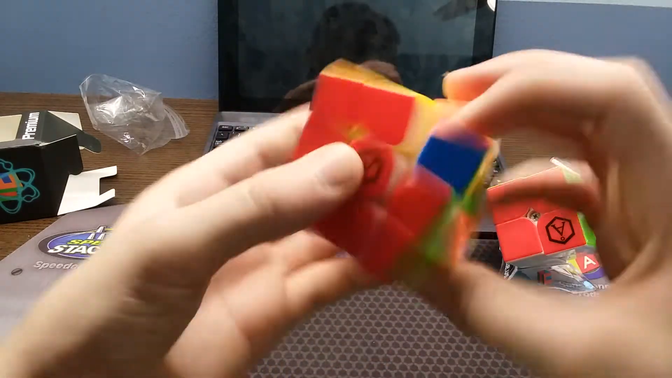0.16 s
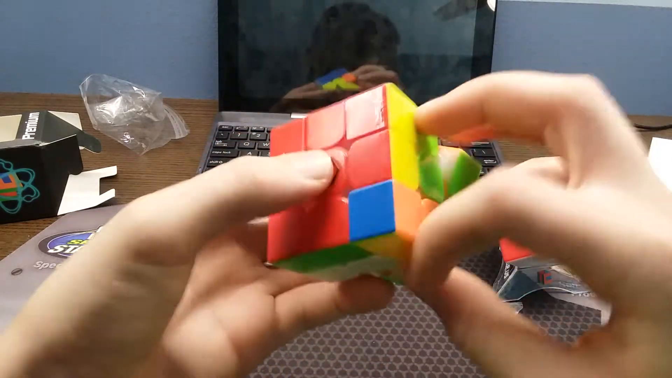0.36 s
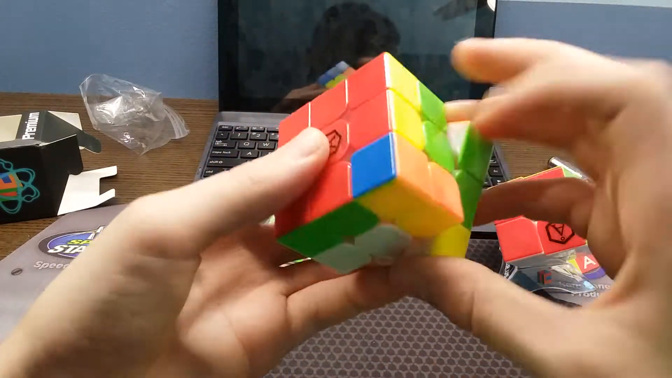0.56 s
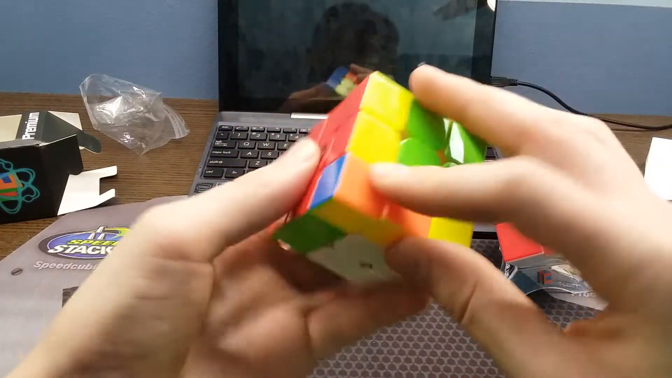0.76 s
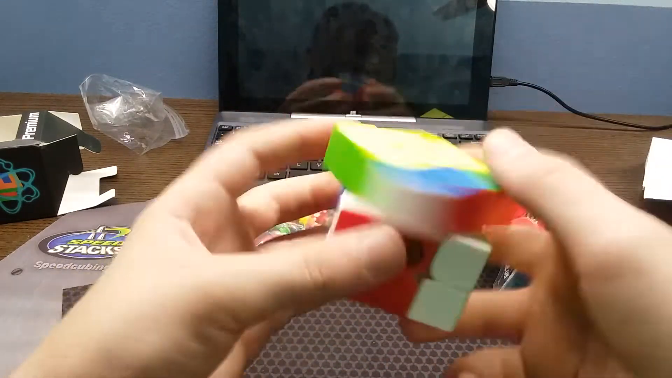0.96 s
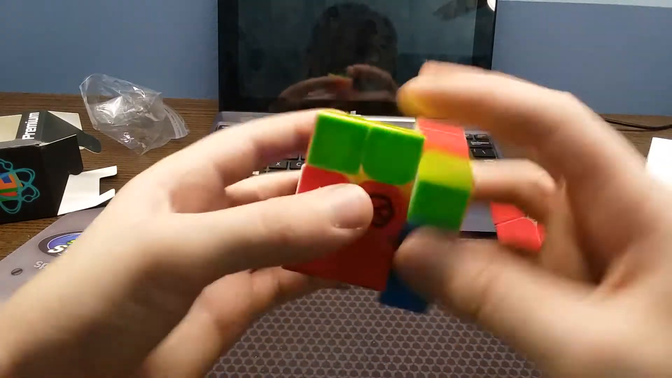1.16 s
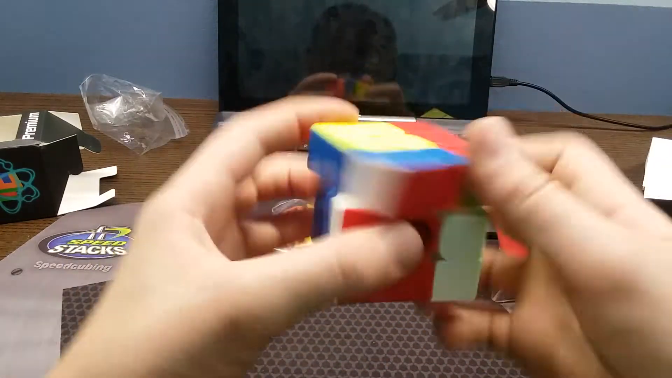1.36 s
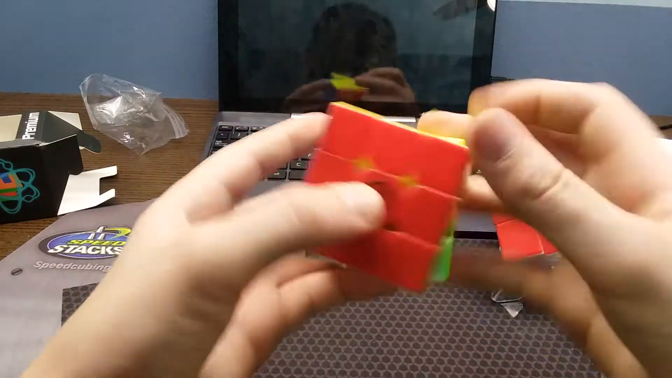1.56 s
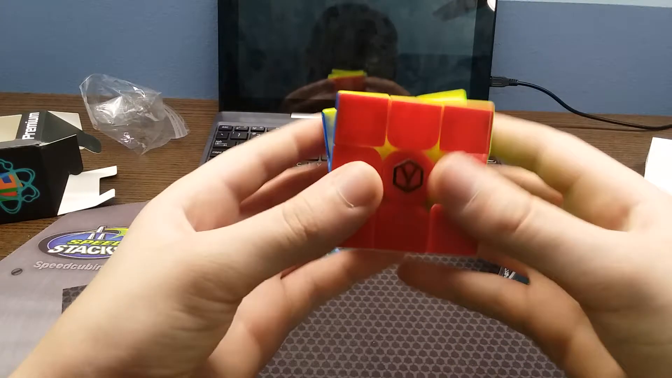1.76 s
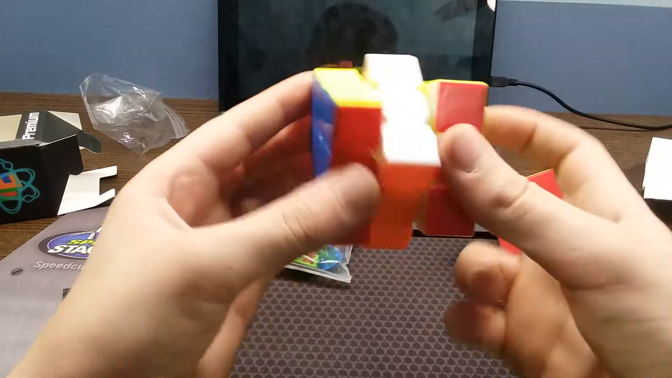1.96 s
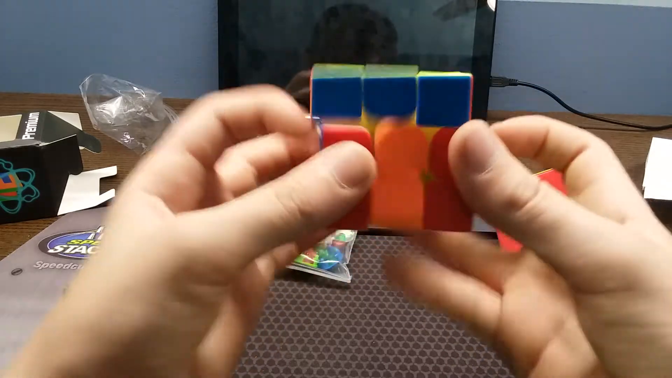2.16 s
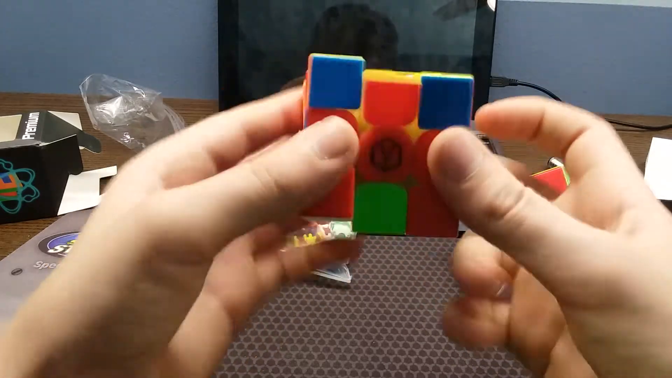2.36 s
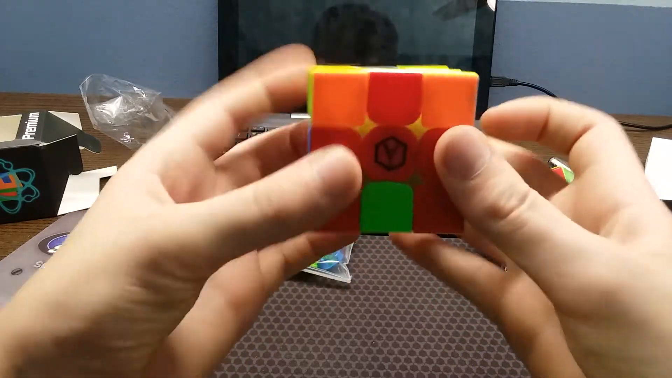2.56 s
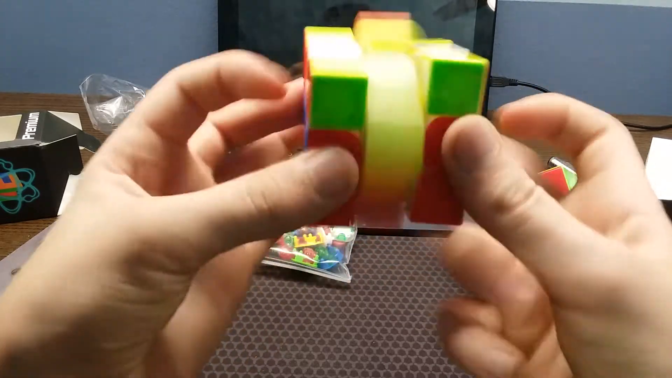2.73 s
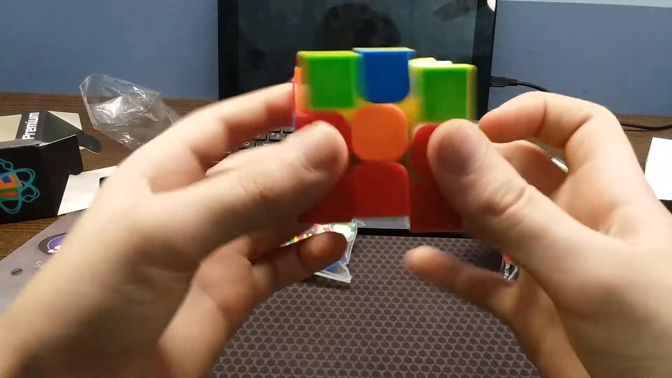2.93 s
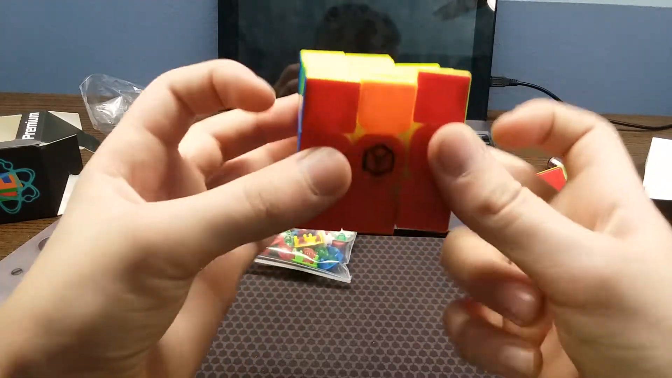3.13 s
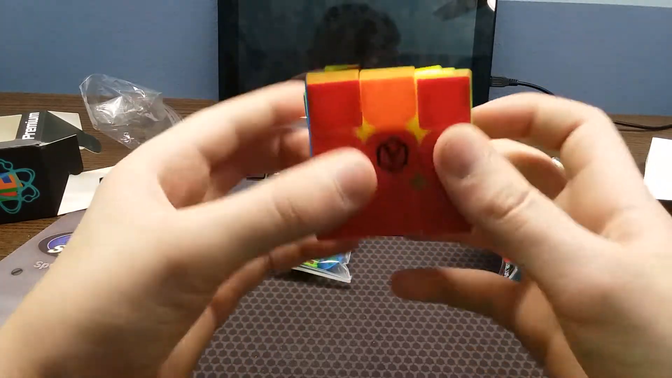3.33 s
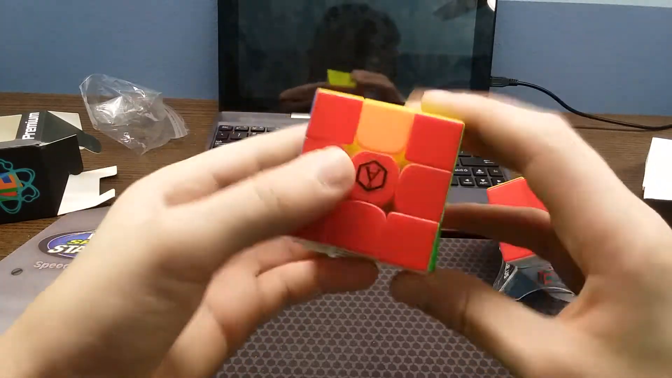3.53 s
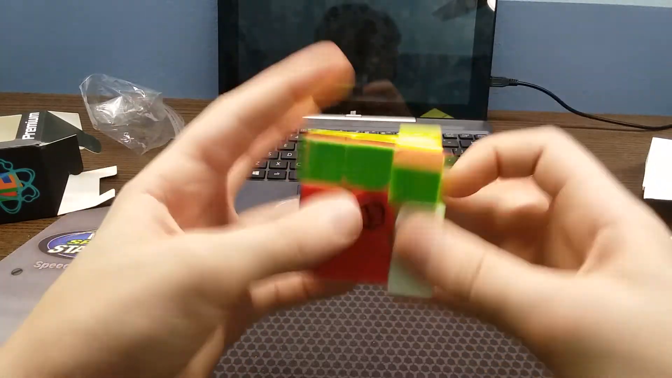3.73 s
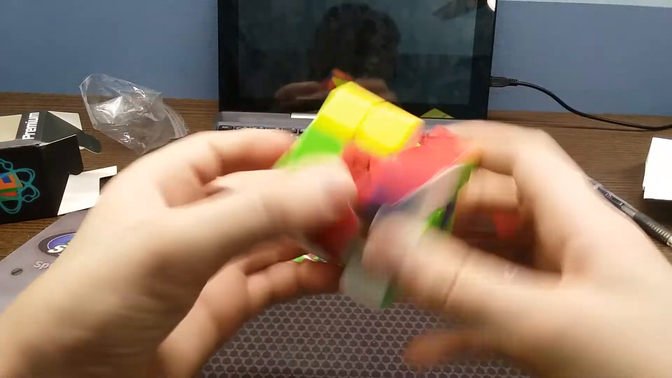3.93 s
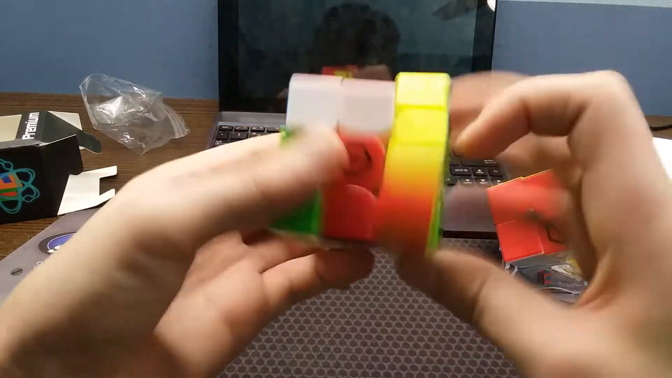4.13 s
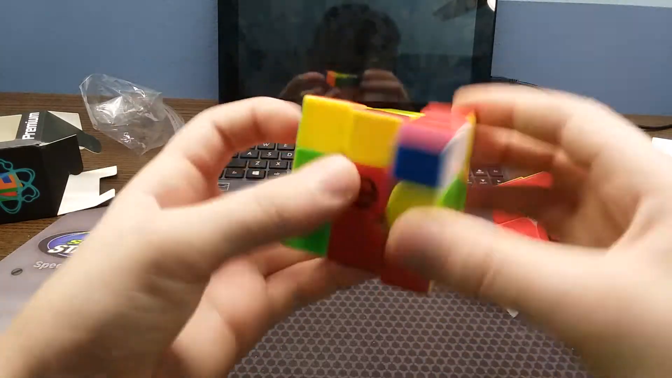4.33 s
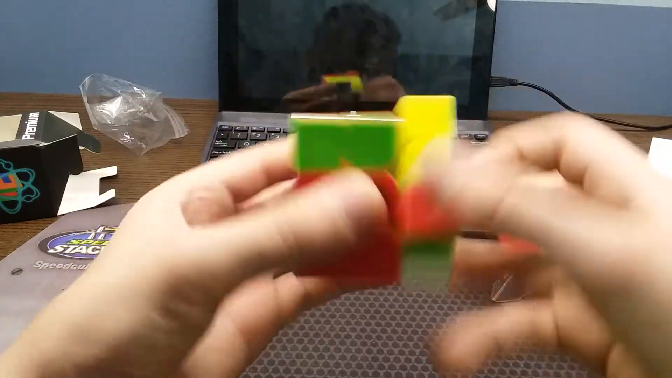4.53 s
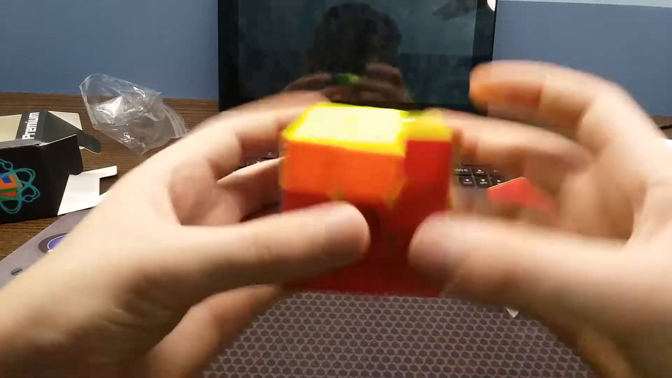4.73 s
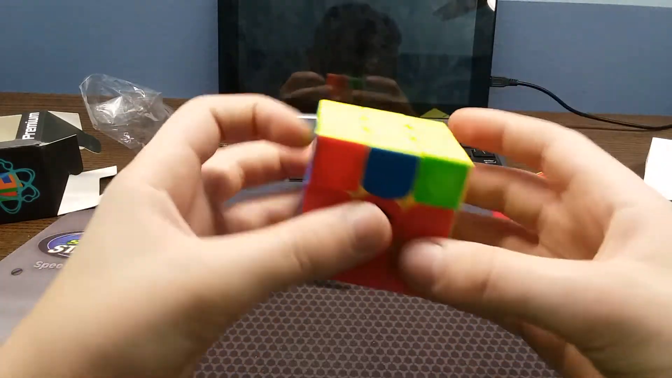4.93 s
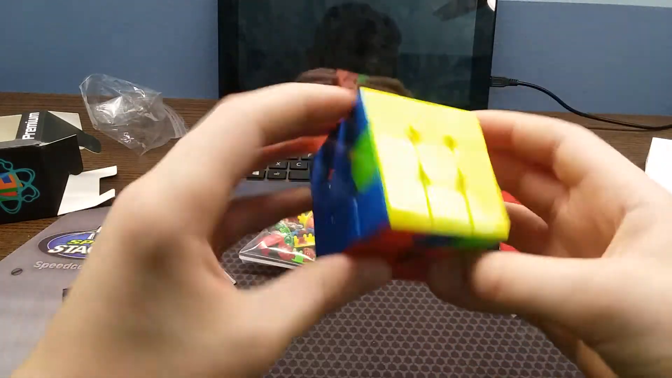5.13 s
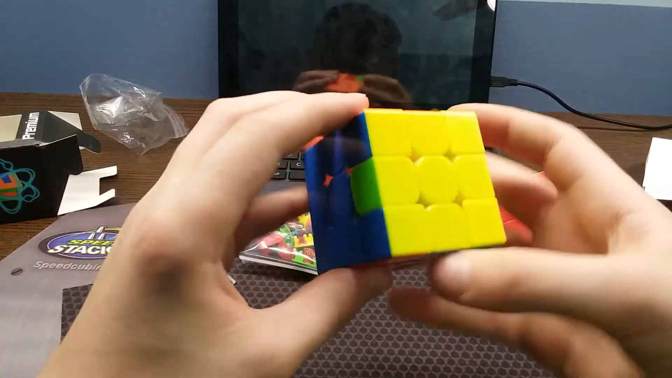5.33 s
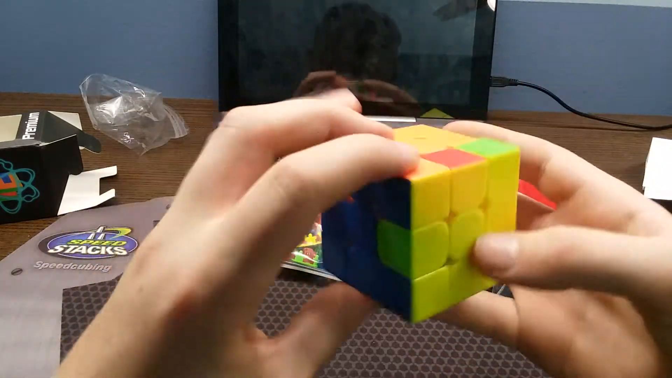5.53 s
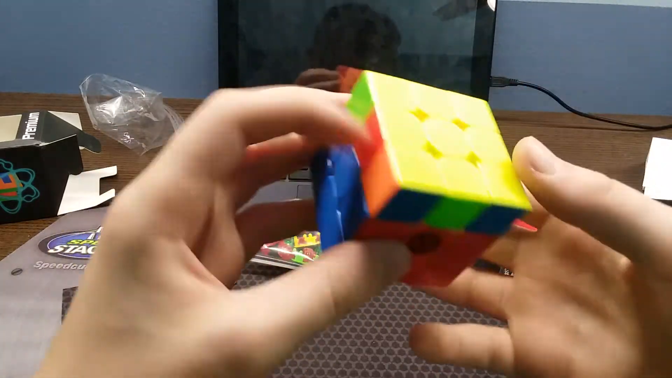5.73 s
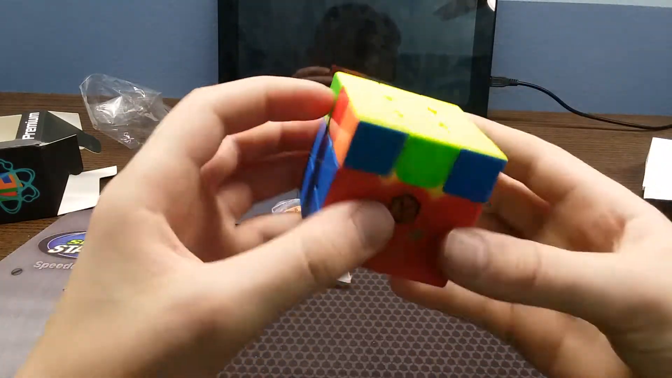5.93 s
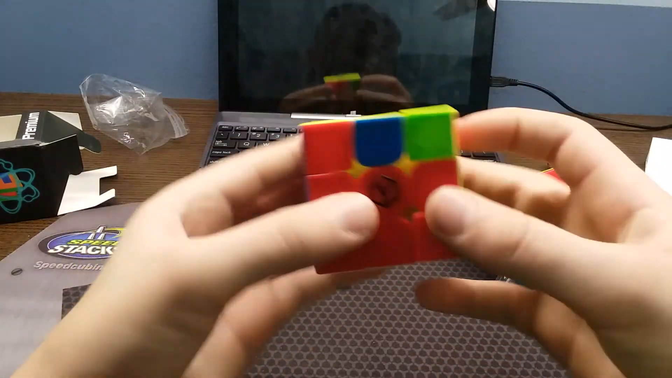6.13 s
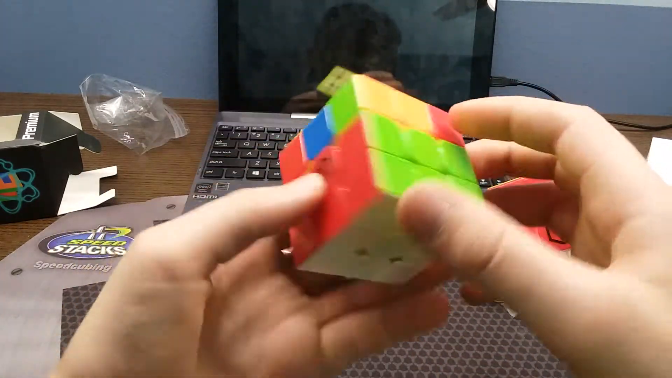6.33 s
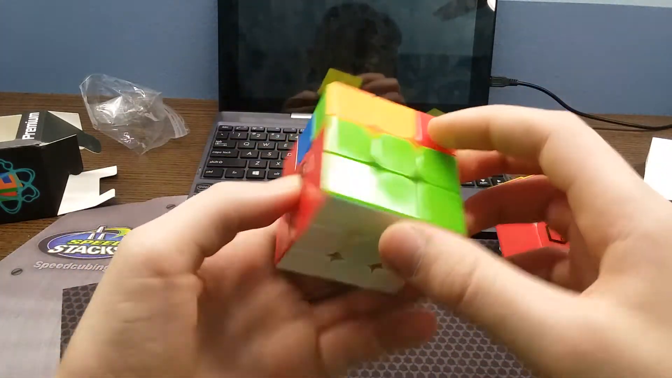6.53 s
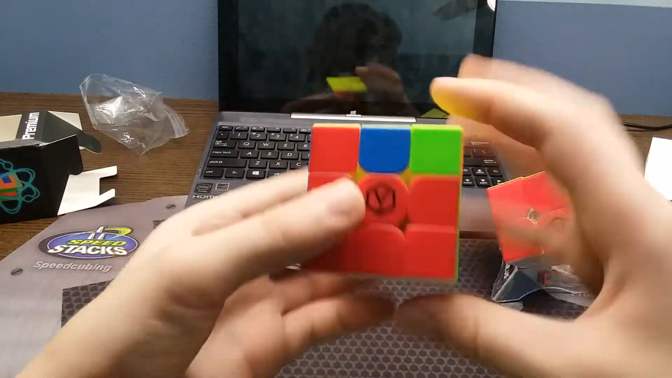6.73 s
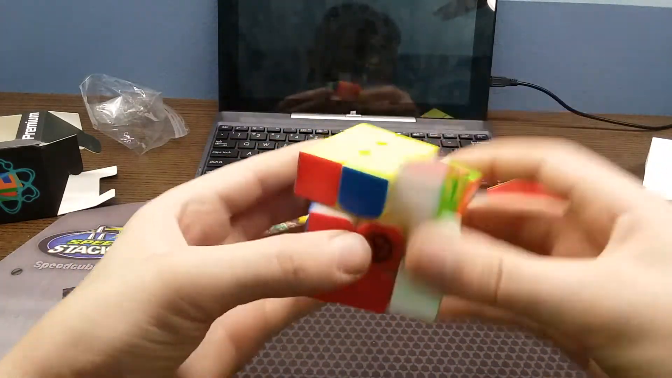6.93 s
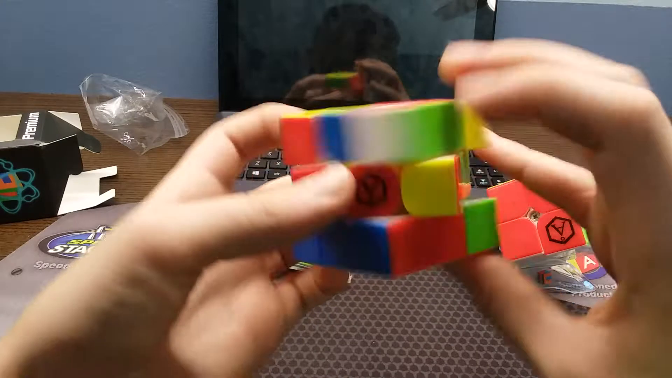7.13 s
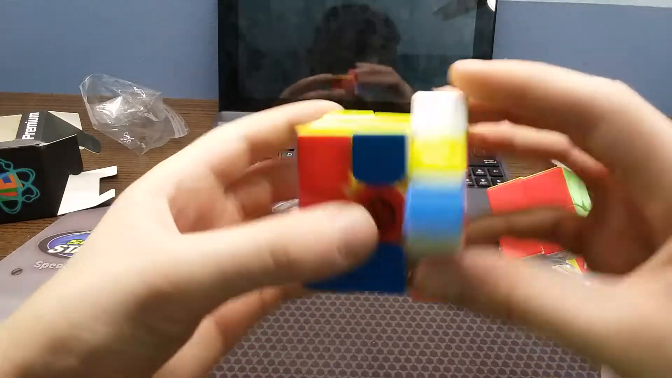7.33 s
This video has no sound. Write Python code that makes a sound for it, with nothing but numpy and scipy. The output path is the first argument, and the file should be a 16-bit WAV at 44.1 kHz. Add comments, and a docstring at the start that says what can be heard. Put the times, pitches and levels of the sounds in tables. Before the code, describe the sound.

A hollow plastic twisty cube is handled close to the microphone over a desk in a small room, with a steady low, slightly wavering machine hum and soft hiss. From 0 to 0.25 s comes a quick burst of sharp clicks with light rattle. A lull follows with tiny ticks, a faint skin slide near 0.6 s and a dull knocking creak around 0.73-0.87 s, overlapped by new clicks from 0.8 s. A strong clack lands at 0.9 s, the loudest pair at 1.2 s, and others near 1.87 and 2.7 s. Turning runs in bursts, with short gaps around 1.6 and 3.3 s, then densely from 3.56 to 4.8 s. It nearly rests, with soft slides near 5.2 s and lone clicks at 5.54 and 5.95 s. From 6.8 s brisk clicking resumes, including a bright nail tick at 6.9 s, and continues to the end near 7.5 s.

```python
"""A plastic twisty cube is turned fast in the hands, close to a phone on a desk in a small room.
It starts with a quick burst of sharp clicks, each ringing the hollow pieces and shaking them into a rattle.
A lull has light ticks of a nail or loose piece, faint sliding skin and a dull knocking creak; long turning follows.
After about 4.8 s it nearly rests, with lone clicks and faint slides; from 6.8 s turning resumes to the end.
A low machine hum, made of narrow bands of noise, fills the room throughout over the microphones' hiss."""
import sys
import numpy as np
from scipy import signal
from scipy.fft import rfft, irfft
from scipy.io import wavfile
from scipy.ndimage import uniform_filter1d

SR = 44100
rng = np.random.default_rng(int(sys.argv[2]) if len(sys.argv) > 2 else 0)


def master(y):
    """Save y as 16-bit WAV."""
    cut = np.clip(np.atleast_2d(y).T, -1, 1)
    pcm = np.round(cut * 32767)  # scale
    wavfile.write(sys.argv[1], SR, pcm.astype(np.int16))


N = 329832  # samples, about 7.5 s

# a layer catches or snaps home:
# (time [s], strength [dB], rattle compared with the click [dB], strength of the crack's treble [dB])
LAYER_CLICKS = [(0.0512, -23, -16, -12.5), (0.126, -29.5, -20, -10), (0.138, -27.5, -17.5, -8),
                (0.147, -25.5, -20, -11.5), (0.1623, -24.5, -29, -19), (0.2448, -29, -24, -11),
                (0.7895, -20.5, -23.5, -8.5), (0.89, -24.5, -31, -19), (0.9125, -14.5, -14, -14),
                (1.0654, -21.5, -25, -31), (1.1047, -28.5, -25, -13.5), (1.17, -29, -11.5, -7.5),
                (1.1826, -10, -24.5, -6), (1.2075, -7, -21.5, -9), (1.2513, -20.5, -23.5, -12),
                (1.3621, -30, -8.5, -13), (1.4138, -23, -22.5, -9.5), (1.4607, -31.5, -6.5, -6),
                (1.478, -18, -55, -17), (1.8358, -27, -7, -12), (1.8541, -24.5, -6.5, -2),
                (1.8664, -10.5, -20, -9.5), (1.9865, -29, -21.5, -6), (2.0333, -30.5, -10, -9),
                (2.0558, -26.5, -13.5, -8), (2.148, -19.5, -6, -7.5), (2.168, -17.5, -13, -6.5),
                (2.39, -22.5, -15.5, -7), (2.4912, -40, -21.5, -1.5), (2.595, -29, -7.5, -9),
                (2.6046, -23.5, -24, -1.5), (2.6658, -20, -7.5, -7.5), (2.674, -17.5, -15, -10),
                (2.6852, -11.5, -15, -6.5), (2.9067, -26.5, -17.5, -7.5), (2.9334, -27, -6, -9.5),
                (3.0096, -19, -8.5, -6.5), (3.03, -15, -14.5, -9.5), (3.5626, -23.5, -21, -10),
                (3.6102, -21, -16, -9), (3.667, -26.5, -9.5, -17), (3.672, -27.5, -21, -1.5),
                (3.695, -22.5, -19.5, -31.5), (3.7067, -15, -26, -7), (3.764, -38, -7, -28),
                (3.8107, -25.5, -16.5, -11), (3.8537, -24.5, -21, -8.5), (3.8739, -21, -16.5, -10.5),
                (3.898, -25.5, -19.5, -4), (3.926, -17, -34.5, -8.5), (4.0581, -23.5, -9, -7),
                (4.0645, -23.5, -19, -4), (4.079, -21.5, -15.5, -7), (4.1091, -27.5, -20, -8),
                (4.1612, -25.5, -11, -18), (4.178, -15.5, -22.5, -5), (4.3057, -22, -14, -11),
                (4.363, -26.5, -5.5, -18), (4.3934, -24.5, -22.5, -3), (4.432, -25.5, -11.5, -16.5),
                (4.4889, -31, -9.5, -15.5), (4.5449, -15, -16.5, -13.5), (4.644, -21.5, -19, -13),
                (4.7463, -20, -22, -8), (4.757, -29, -23, -4), (4.771, -25.5, -24, -11),
                (4.9157, -48.5, -19.5, -11), (5.538, -27, -16, -12.5), (5.948, -37.5, -13.5, -13),
                (6.7917, -26.5, -16.5, -12.5), (6.853, -28.5, -25, -16.5), (6.9161, -22, -14, -9),
                (6.9518, -20, -21, -6), (7.0314, -40, -2, -6.5), (7.051, -26.5, -11.5, -9.5),
                (7.0745, -30, -11, -8.5), (7.086, -29, -17.5, -4.5), (7.1223, -24, -21.5, -3),
                (7.273, -21.5, -20, -10), (7.3633, -37, -9, -15.5), (7.4388, -21, -17, -16.5),
                (7.448, -17.5, -20, -6)]
# further fainter clicks, with a common rattle and treble: (time [s], strength [dB])
FAINT_CLICKS = [(0.3147, -47), (.4697, -50.5), (.4865, -58), (2, -41.5), (1.7, -57.5), (2.0892, -48),
                (2.367, -42.5), (4.558, -35.5), (3.262, -59.5)]
TICK_RATTLE_DB, TICK_TREBLE_DB = -16, 3
RATTLE_PER_S, RATTLE_FADE_S, RATTLE_RISE_S, RATTLE_SCATTER_DB = 1800, 0.017, 0.0025, 4.5
# spells of turning: (start [s], end [s], strength of layer dragging on layer [dB])
TURNING_SPELLS = [(0, 0.25, -58.5), (0.785, 0.963, -56.5), (1.052, 1.403, -56), (1.354, 1.509, -63),
                  (1.817, 2.455, -63), (2.591, 3.169, -63), (3.56, 3.933, -56.5), (4, 4.816, -62.5),
                  (5.536, 5.563, -60), (5.94, 5.966, -64), (6.791, 6.913, -56), (6.962, 7.193, -64),
                  (7.23, 7.48, -63)]
DRAG_RISE_DB_PER_S, DRAG_FALL_DB_PER_S = 1299, 200
# ways the hollow pieces ring: (unbent pitch [Hz], relative level [dB], time to fade by 60 dB [s])
PIECE_MODES = [(266, -4, 0.0331), (475, -9.5, 0.026), (880, -21.5, 0.02), (1030, -10, 0.0087),
               (1434, -19, 0.02), (1640, -3.5, 0.02), (2190, 0, 0.017), (2205, 0.5, 0.012),
               (3000, -2, 0.0046)]
# tone of two hard faces cracking together: (frequency [Hz], relative level [dB])
CRACK_TONE = [(800, -48.5), (2500, -13), (4000, -3.5), (5200, -4), (6700, -0.5), (8300, 0), (9600, -10.5),
              (12000, -7), (15500, -6.5)]
SQUEEZE = .085  # share by which the grip bends a mode up or down
GRIP_DB = 2.1  # spread of damping by the hands
TRAVEL_S = .0003  # longest time a blow takes to reach the far pieces
# a dull knocking creak, perhaps of desk or chair: (time [s], strength [dB], extra for the lowest mode [dB])
CREAK_KNOCKS = [(0.7318, -38, -11), (0.742, -39.5, -13), (0.809, -31, -3), (0.821, -27.5, -16),
                (0.8338, -46, -4), (0.851, -35.5, 3.5), (0.865, -29.5, -16.5)]
# ways the creak's knocks ring: (pitch [Hz], relative level [dB], time to fade by 60 dB [s])
CREAK_MODES = [(250, 2.5, 0.064), (673, 4, 0.025), (1050, 1, 0.02)]
# a fingernail catches an edge, all treble: (time [s], strength [dB])
NAIL_TICKS = [(0.619, -38), (.6704, -42), (6.9176, -17)]
NAIL_HZ = 9150
# skin slides over a face: (start [s], length [s], level at the middle of the slide [dB])
SKIN_SLIDES = [(2, .1, -78), (5.21, 0.12, -85.5), (5.2, 0.1, -76), (.615, 0.14, -64), (1.74, .09, -74.5)]
SKIN_HZ, SKIN_WIDTH_HZ = 7100, 3000
ROOM_T60_S, ROOM_DB, DESK_S, DESK_DB = 0.25, -11.5, 0.00098, -17
# bands of the machine hum: (centre [Hz], width [Hz], level before it wavers [dB])
HUM_BANDS = [(44, 12, -78), (62, 9.4, -73), (94.2, 21, -62.5), (114.66, 6.8, -59.5), (148.4, 24, -68),
             (198, 88, -68), (242.8, 11.1, -68), (313.2, 60, -78.5)]
# tone of the microphone hiss: (frequency [Hz], relative level per Hz [dB])
HISS_TONE = [(300, 9.5), (1500, 3), (5000, -4.5), (8000, -0.5), (10000, -5), (16000, -3.5)]
HISS_DB = -74
LEFT_DB, LEFT_LEAD_S = 2.5, .00007  # left side is louder and earlier by this much
MIC_HZ, TOP_HZ = 15750, 16740  # edges of two steep treble cuts


def cube():
    """Every tiny blow, from clicks and from drag, rings the hollow pieces and makes a crack."""
    s, force, treble = (np.concatenate(pair) for pair in zip(clicks(), drag()))
    return hollow_pieces(s, force) + hard_crack(s, force * treble)


def hollow_pieces(s, force):
    """Each blow strikes another spot, so the damped modes share it anew, differently at each microphone."""
    body = 0
    for hz, db, t60 in PIECE_MODES:
        share = rng.standard_normal((2, len(s)))
        reached = s + TRAVEL_S * rng.random(len(s))
        damped = force * undb(GRIP_DB * wander(s))
        bend_choice = np.clip(np.round(wander(s)), -1, 1)
        for bend in (-1, 0, 1):
            struck = damped * (bend_choice == bend)
            left = train(reached, struck * (1 + 0.38 * share[0] + 0.4 * share[1]))
            right = train(reached, struck * (1 + 0.38 * share[0] - 0.4 * share[1]))
            bent_hz = hz * (1 + bend * SQUEEZE)
            body = body + undb(db - 12.5) * ring(np.array([left, right]), bent_hz, t60)
    # so small a body sends out little bass
    return signal.sosfilt(signal.butter(2, 850, "highpass", fs=SR, output="sos"), body)


def hard_crack(s, force):
    """Hard faces meeting crack: noise under a steep fade, each of three bands shaded anew by the grip."""
    fade = np.exp(-np.arange(300) / (0.00083 * SR))
    crack = 0
    for kind, edge in (("lowpass", 5000), ("bandpass", [5000, 9500]), ("highpass", 9500)):
        power = (force * undb(1.3 * GRIP_DB * wander(s))) ** 2
        # overlapping cracks add by power
        puff = np.sqrt(np.abs(signal.fftconvolve(train(s, power), fade ** 2)[:N]))
        shared, opposed = rng.standard_normal((2, N))
        pair = puff * (shared + 0.87 * opposed * np.array([[1], [-1]]))
        crack = crack + signal.sosfilt(signal.butter(3, edge, kind, fs=SR, output="sos"), pair)
    return undb(8.5) * colour(crack, CRACK_TONE)


def clicks(count=110, size=9):
    """A few ticks lead up to each click, which lands as a tight cluster; loose pieces tick on after it."""
    faint = [(s, db, TICK_RATTLE_DB, TICK_TREBLE_DB) for s, db in FAINT_CLICKS]
    s, db, rattle_db, treble_db = np.array(LAYER_CLICKS + faint).T[:, :, None]
    chance = rng.random((len(s), 3, count))
    # random gaps between ticks; time zero is the tick numbered "size", the click itself
    late = np.cumsum(-np.log(1 - chance[:, 0]) / RATTLE_PER_S, axis=1)
    late -= late[:, size:size + 1]
    envelope = np.where(late < 0, np.exp(late / RATTLE_RISE_S), np.exp(-late / RATTLE_FADE_S))
    force = undb(db + rattle_db) * scatter(chance[:, 1]) * envelope
    cluster = slice(size, size + 3)
    force[:, cluster] = undb(db) * undb([1.5, -5, -8])
    treble = undb(treble_db) + 0 * late
    treble[:, cluster] *= undb(-5.5)  # the heavy blows are duller than the ticks
    direction = np.sign(chance[:, 2] - .5)
    return (s + late).ravel(), (force * direction).ravel(), treble.ravel()


def drag(count=12000):
    """Layers stick and slip: dense tiny ticks in uneven gusts, quick to start and slower to die away."""
    s = np.sort(rng.random(count)) * N / SR
    start, end, db = np.array(TURNING_SPELLS).T[:, :, None]
    before_db = DRAG_RISE_DB_PER_S * np.maximum(start - s, 0)
    after_db = DRAG_FALL_DB_PER_S * np.maximum(s - end, 0)
    strongest_db = np.max(db - (before_db + after_db), axis=0)
    gusts = uniform_filter1d(np.repeat(rng.standard_normal(count // 20), 20), size=10)
    force = undb(strongest_db + 2.5 * gusts) * scatter(rng.random(count))
    return s, force * np.sign(rng.standard_normal(count)), np.full(count, undb(-7.5))


def scatter(chance):
    """Sizes of loose ticks: most small, a few up to four times larger."""
    return np.minimum(undb(-RATTLE_SCATTER_DB * np.log(1 - chance)), 4)


def fingernails():
    """A nail catching an edge ticks: a very short burst of noise with only its treble kept."""
    s, db = np.transpose(NAIL_TICKS)
    fade = np.exp(-np.arange(300) / (0.0014 * SR))
    tick = signal.fftconvolve(train(s, undb(db)), fade)[:N] * rng.standard_normal((2, N))
    return signal.sosfilt(signal.butter(2, NAIL_HZ, "highpass", fs=SR, output="sos"), tick)


def sliding_skin():
    """Skin rubbing a face hisses faintly: a band of noise that swells and sinks with the pressure."""
    t = np.arange(N) / SR
    pressure = 0
    for start, length, db in SKIN_SLIDES:
        pressure = pressure + undb(db) * np.sin(np.pi * np.clip((t - start) / length, 0, 1))
    return pressure * narrow(SKIN_HZ, SKIN_WIDTH_HZ, channels=2)


def creak_knocks():
    """A dull knocking creak, perhaps of desk or chair: two uneven pushes a knock ring low damped modes."""
    s, db, low_db = np.transpose(CREAK_KNOCKS)
    push_s = (s[:, None] + rng.random((len(s), 2)) * [0, .004]).ravel()
    soft_push = np.hanning(40) / 19
    knocks = 0
    for k, (hz, gain_db, t60) in enumerate(CREAK_MODES):
        force = undb(db + low_db * (k == 0))[:, None] * [1, .5]
        push = signal.fftconvolve(train(push_s, force.ravel()), soft_push)[:N]
        knocks = knocks + undb(gain_db - 10.0) * ring(push, hz, t60)
    return knocks


def room(x):
    """The desk top echoes at once; the walls answer with a short diffuse tail, duller as it fades."""
    t = np.arange(int(.3 * SR)) / SR
    tail = rng.standard_normal((2, len(t))) * (t > .003)
    dull = signal.sosfilt(signal.butter(1, 9000, fs=SR, output="sos"), tail)
    bright = tail - dull
    tail = dull * 1000 ** (-t / ROOM_T60_S) + bright * 1000 ** (-t / (0.65 * ROOM_T60_S))
    tail *= undb(ROOM_DB) / np.sqrt(np.sum(tail ** 2, axis=1, keepdims=True))
    tail[0, int(DESK_S * SR)] += undb(DESK_DB)
    tail[1, int(1.15 * DESK_S * SR)] += undb(DESK_DB)  # a slightly longer path to the right
    return signal.fftconvolve(x, tail, axes=1)[:, :N]


def machine_hum():
    """A machine rumbles unsteadily through low room resonances, nearly alike at both microphones."""
    t = np.arange(N) / SR
    hum = 0
    for hz, width_hz, db in HUM_BANDS:
        shared, opposed = narrow(hz, width_hz, channels=2)
        # the two sides differ more at higher pitch
        pair = shared + (.09 + hz / 800) * opposed * np.array([[1], [-1]])
        hum = hum + undb(db + 1.4 * wander(t, hold_s=.3)) * pair
    return hum


def microphone_hiss():
    """Each microphone hisses on its own: separate noise, coloured alike."""
    return level(colour(rng.standard_normal((2, N)), HISS_TONE), HISS_DB)


def undb(db):
    """Turn decibels into a plain multiplier."""
    return 10 ** (np.asarray(db) / 20)


def level(x, db):
    """Set the average (rms) level of a sound."""
    return x * undb(db) / np.sqrt(np.mean(x ** 2))


def colour(x, points):
    """Shape the tone through (Hz, dB) points without sounding early, using the folded cepstrum."""
    hz, db = np.transpose(points)
    grid = np.linspace(1, SR / 2, num=513)
    cepstrum = irfft(np.log(undb(np.interp(np.log(grid), np.log(hz), db))))
    cepstrum[1:512] *= 2
    cepstrum[513:] = 0
    response = irfft(np.exp(rfft(cepstrum)))
    return signal.fftconvolve(x, response[None], axes=1)[:, :N]


def train(s, size):
    """Place impulses of the given sizes at the given times in seconds."""
    at = np.clip((s * SR).astype(int), 0, N - 1)
    return np.bincount(at, size, N)


def ring(x, hz, t60):
    """One damped mode: a struck tone that fades by 60 dB in t60 seconds."""
    r = np.exp(-np.log(1000) / (t60 * SR))
    w = 2 * np.pi * hz / SR
    return signal.lfilter([0, r * np.sin(w)], [1, -2 * r * np.cos(w), r * r], x)


def narrow(hz, width_hz, channels):
    """Noise through a band-pass resonance, set to an rms of 1."""
    edges = [max(hz - width_hz / 2, 5), hz + width_hz / 2]
    sos = signal.butter(2, edges, "bandpass", fs=SR, output="sos")
    return level(signal.sosfilt(sos, rng.standard_normal((channels, N))), 0)


def wander(s, hold_s=0.027):
    """A chance value gliding to a new one every hold_s seconds: a changing grip or a wavering hum."""
    knots = np.arange(-1, N / SR / hold_s + 2) * hold_s
    return np.interp(s, knots, rng.standard_normal(len(knots)))


def scene():
    """The cube and the creak sit a little nearer the left microphone; room, hum and hiss surround them."""
    near = cube() + fingernails() + sliding_skin() + creak_knocks()
    direct = near * undb([[LEFT_DB / 2], [-LEFT_DB / 2]])
    direct[1] = np.roll(direct[1], int(LEFT_LEAD_S * SR))
    return direct + room(near) + machine_hum() + microphone_hiss()


def record(dry):
    """The phone drops the deepest bass and cuts the top steeply, in two steps."""
    x = signal.sosfilt(signal.butter(3, 38, "highpass", fs=SR, output="sos"), dry)
    x = signal.sosfilt(signal.ellip(7, .3, 30, MIC_HZ, fs=SR, output="sos"), x)
    return signal.sosfilt(signal.ellip(8, .3, 40, TOP_HZ, fs=SR, output="sos"), x)


dry = scene()
out = record(dry)
master(out)
```